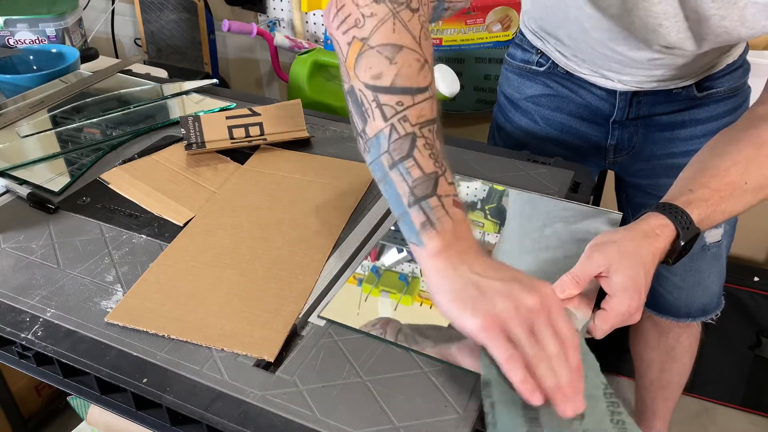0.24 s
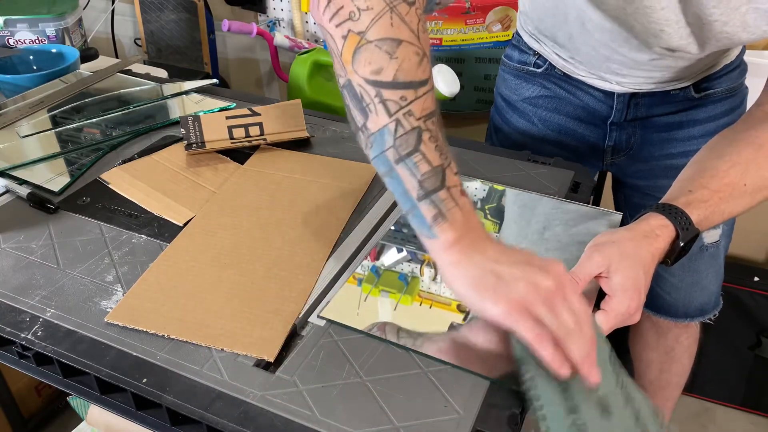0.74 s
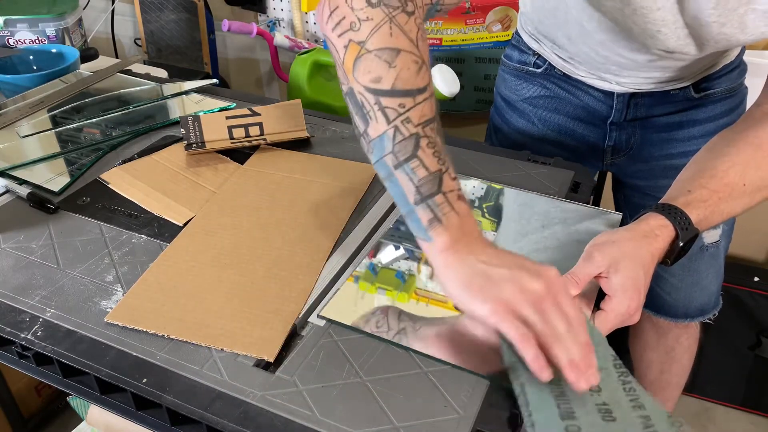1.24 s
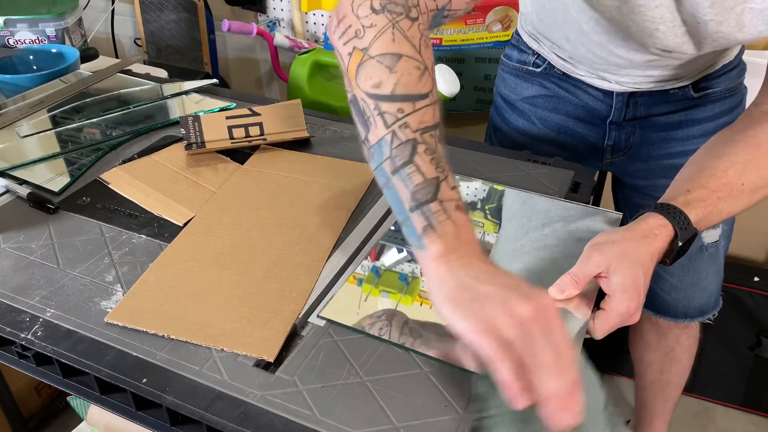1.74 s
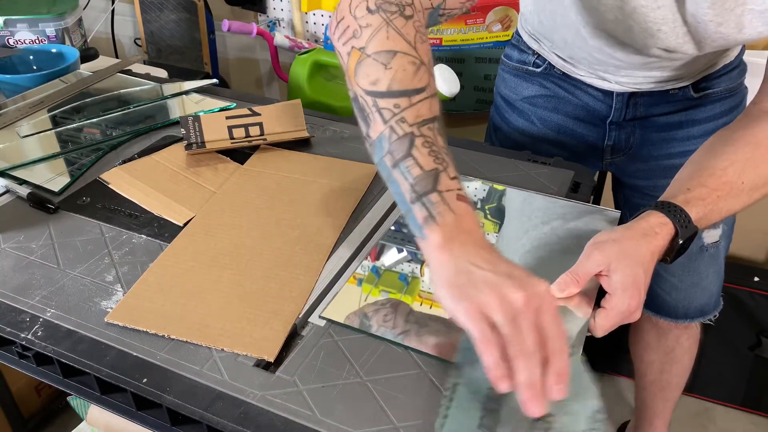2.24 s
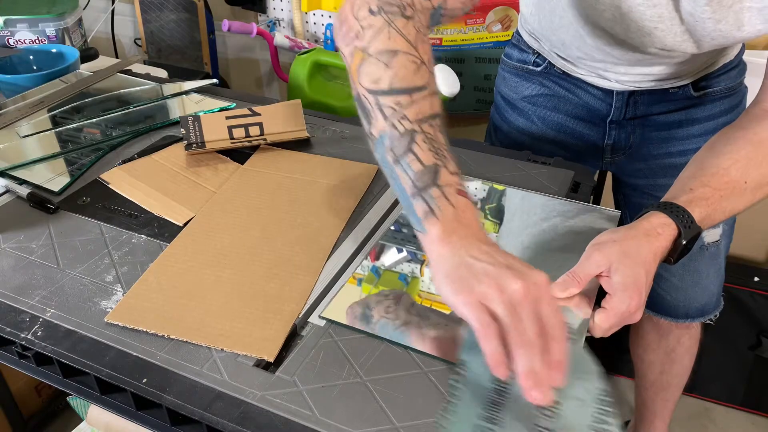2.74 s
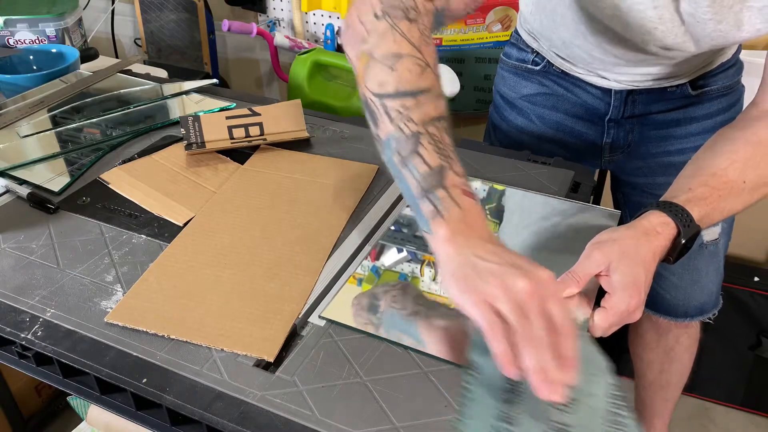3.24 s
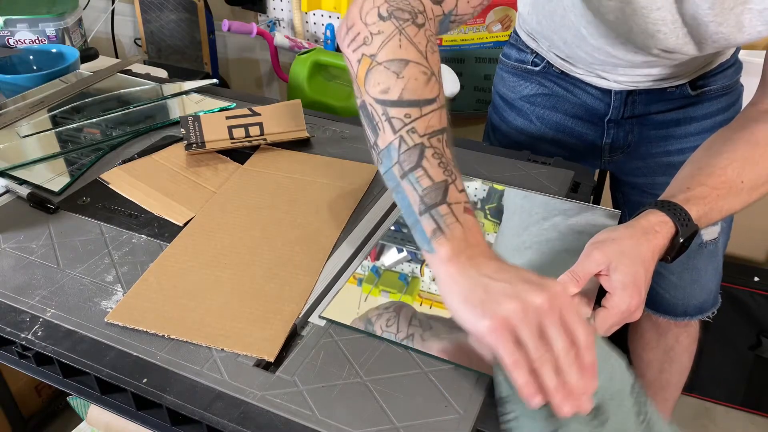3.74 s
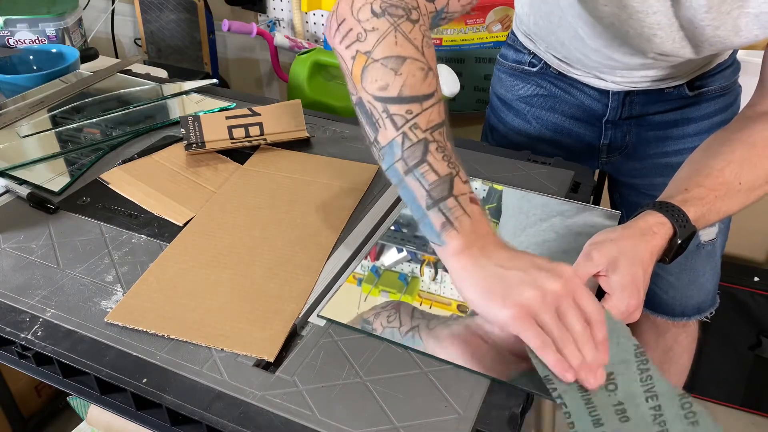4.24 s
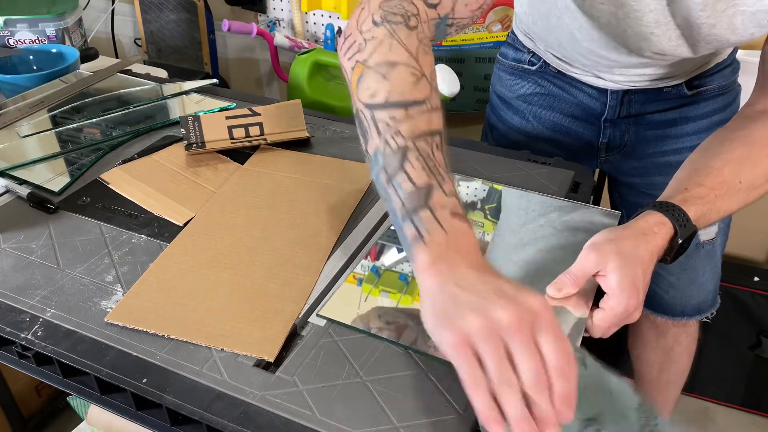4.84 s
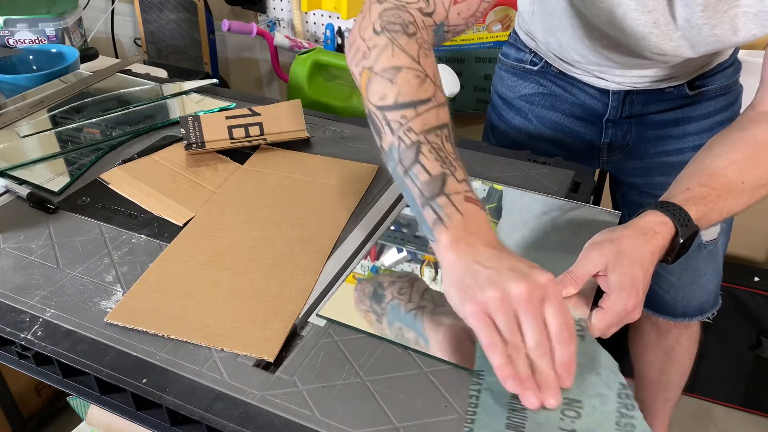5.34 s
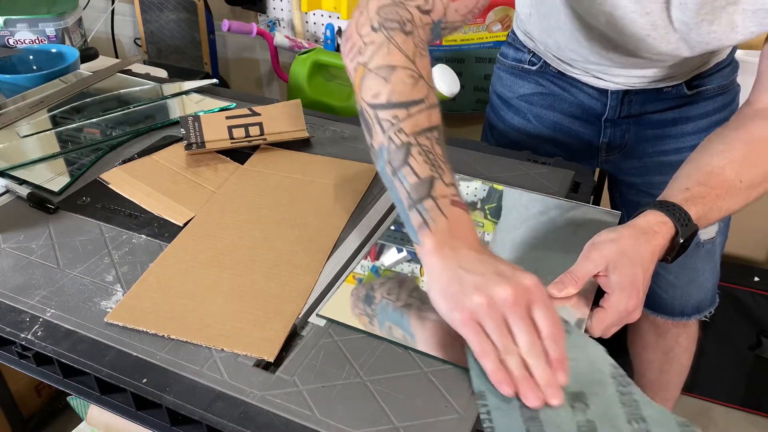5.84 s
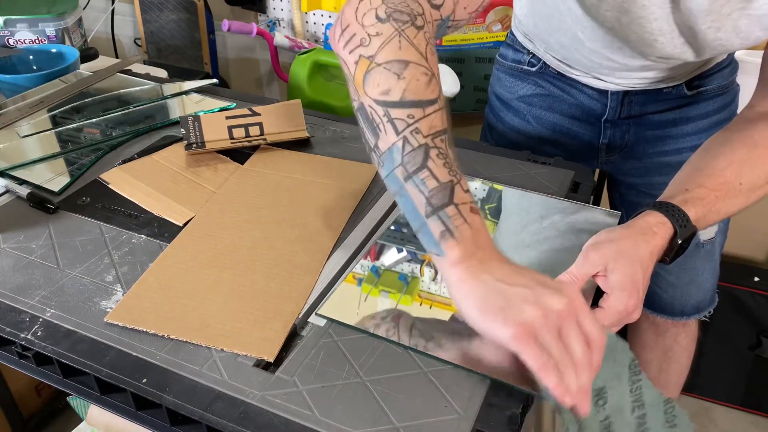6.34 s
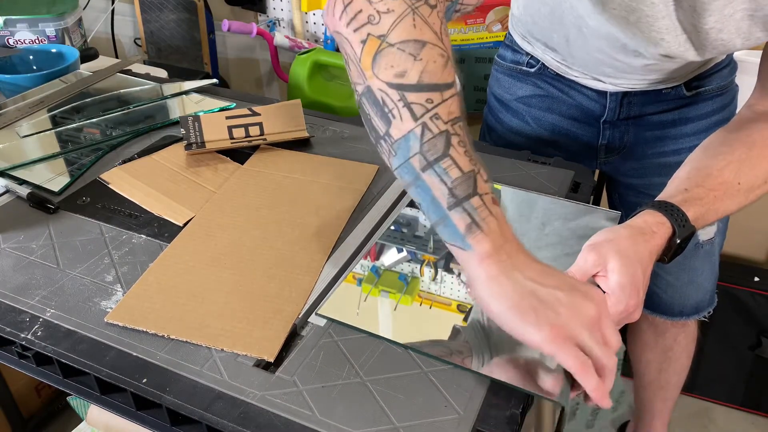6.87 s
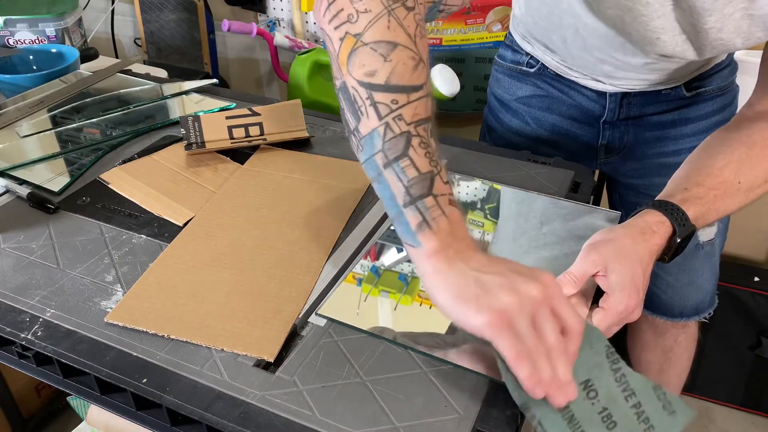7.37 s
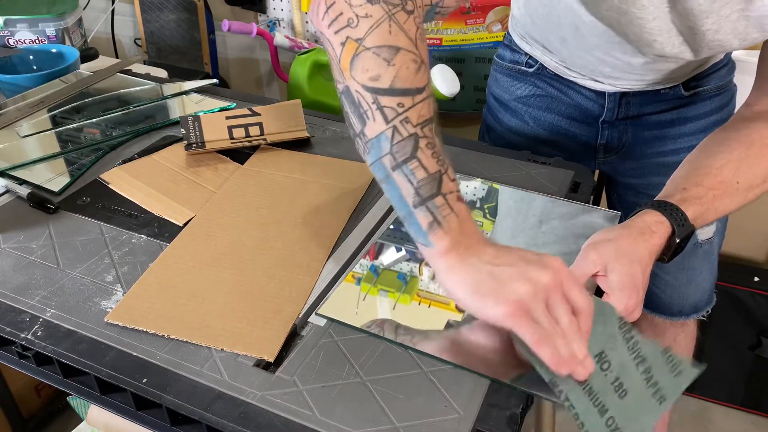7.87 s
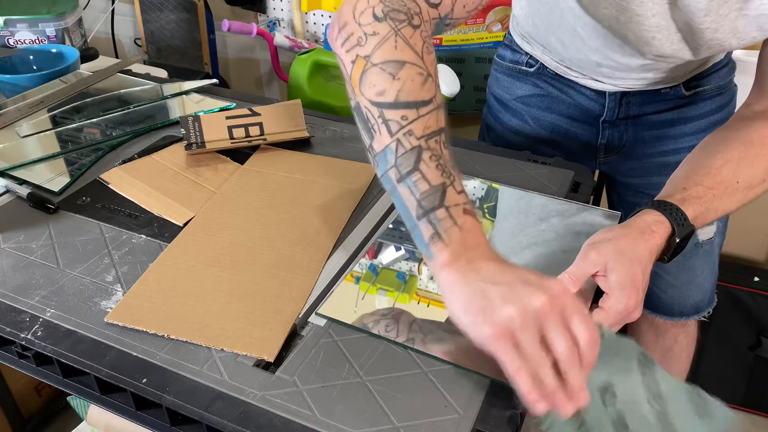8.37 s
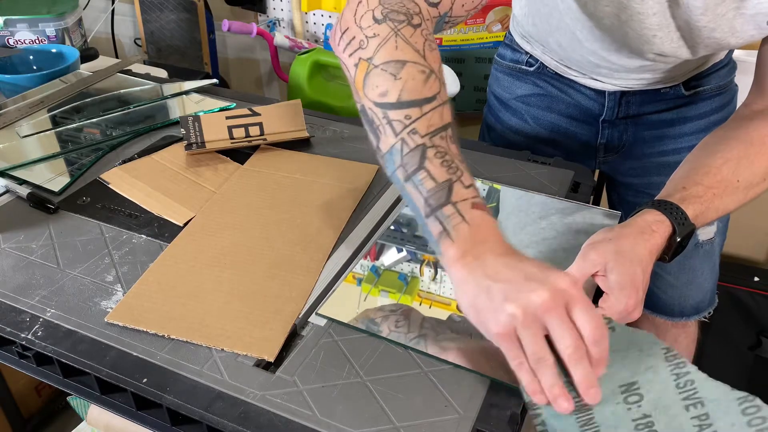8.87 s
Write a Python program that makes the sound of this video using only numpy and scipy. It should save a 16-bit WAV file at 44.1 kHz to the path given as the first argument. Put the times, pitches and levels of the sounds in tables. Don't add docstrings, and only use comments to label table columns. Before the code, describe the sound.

A hand rubs sandpaper along the cut edge of a glass tile on a workbench, heard close in a damped workshop. From 0 to 2 seconds, strong, gritty rasps alternate rapidly, about nine or ten a second, with bright hiss, sharp grit clicks and small bench thuds. Around 2.1 a short squeak marks a sudden drop; until 3.6 the rubs are faint, airy and slower, swelling slightly near 3. From 3.6 to 4.8 choppier, more tonal scrapes catch and snag. Near-silence follows, then taps and paper contact around 5.15 to 5.25, and uneven strokes build until 6.1. After a tiny gap, quick, regular strokes run from 6.25 to the end just after 9, with clicks and brief clear glassy notes. The sound is narrow-band, without extreme highs, over a nearly silent background.

```python
import sys
import numpy as np
from scipy import signal
from scipy.io import wavfile
from scipy.ndimage import uniform_filter1d

SR = 44100
rng = np.random.default_rng(int(sys.argv[2]) if len(sys.argv) > 2 else 0)


def gain_from_decibels(decibels):
    exponent = np.asarray(decibels, float) / 20
    return 10 ** exponent


def int16_out(signal):
    q = np.round(np.clip(np.atleast_2d(signal).T, -1, 1) * 32767)
    wavfile.write(sys.argv[1], SR, q.astype(np.int16))


N = 401751

# time in seconds, slack of the sheet (paper in dB against the scrape),
# freedom of the tile (ring in dB against the paper), weight on the bench (dB against the paper).
GRIP = [(0, -11, -4.5, -12), (1.5, -9.5, -4, -11), (2.03, -8.5, -3, -11), (2.2, -4.5, -6, -6),
        (2.5, -9.5, -8.5, -8.5), (3.0, -14, -9, -6.5), (3.42, -2.5, -5.5, -9.5), (3.699, -10, 0, -10),
        (4.1, -12, -9.5, -9), (4.45, -16.5, -10, -4), (4.75, -16.5, -6, -12), (5.2, -6, -11, -7),
        (5.7, -6.5, -10.5, -14.5), (6.3, -10.5, -7, -8), (6.95, -7.5, 0, -9.5), (7.5, -11, -7, -10.5),
        (8.5, -6.5, -4, -13), (9.05, -7.5, -5, -11)]
# time in seconds, their strength in dB
# against the body, edge pitch in Hz, hiss pitch in Hz.
FOCUS = [(0, 3, 2580, 5000), (.62, -8.5, 3020, 5200), (2, -7.5, 2940, 5070), (2.3, 5.5, 3230, 5340),
         (2.62, 1.5, 3370, 5200), (2.79, 6, 3100, 5130), (2.95, 0, 3580, 5450), (3.12, 0, 3480, 4980),
         (3.62, 2.5, 2920, 5180), (3.9, 6.5, 2920, 5760), (4.25, 5.5, 2840, 5360), (4.6, 7, 2890, 5340),
         (4.8, 0.5, 2800, 5710), (5.3, -6.5, 2920, 5330), (7.8, -7.5, 3000, 5440), (8.1, -4, 3310, 5570),
         (9.1, -4, 2960, 5960)]

# time of top speed in seconds, rise in seconds, fall in seconds,
# edge level in dB, grit hiss in dB against the edge.
FIRM_STROKES = [(0.012, 0.048, 0.057, -28.5, 5.5), (0.122, 0.057, 0.062, -23.5, 4.5),
                (0.216, 0.056, 0.065, -24, 3.5), (0.35, 0.074, 0.043, -20, 1.5),
                (0.419, 0.044, 0.09, -21.5, 4), (0.555, 0.071, 0.044, -20.5, 4),
                (0.635, 0.051, 0.093, -23, 4), (0.776, 0.075, 0.043, -21.5, 4.5),
                (0.848, 0.041, 0.11, -24, 6), (1.025, 0.088, 0.038, -24.5, 3.5),
                (1.114, 0.056, 0.072, -23.5, 2), (1.237, 0.061, 0.047, -21, 1),
                (1.306, 0.031, 0.12, -21.5, 1.5), (1.41, 0.015, 0.11, -20, 4.5),
                (1.539, 0.04, 0.077, -24, 1.5), (1.669, 0.062, 0.055, -23.5, 0.5),
                (1.743, 0.033, 0.093, -22, 1.5), (1.887, 0.086, 0.064, -24, 4.5),
                (1.959, 0.02, 0.045, -23, 2.5), (1.989, 0.01, 0.13, -28.5, 2.5)]
# time in seconds, rise in seconds, fall in seconds, edge level in dB,
# hiss in dB against the edge.
LIGHT_STROKES = [(2.1, 0.0076, 0.063, -27, 9), (2.184, 0.04, 0.057, -42, 7.5),
                 (2.302, 0.054, 0.098, -46, 11), (2.509, 0.12, 0.039, -42.5, 4.5),
                 (2.632, 0.088, 0.087, -39.5, 3.5), (2.792, 0.07, 0.063, -33, 6.5),
                 (2.959, 0.08, 0.074, -30.5, 3), (3.133, 0.096, 0.073, -38.5, 4.5),
                 (3.289, 0.102, 0.021, -48, 3.5), (3.358, 0.074, 0.06, -43.5, 1),
                 (3.437, 0.027, 0.11, -44, 3), (3.548, 0.036, 0.091, -44, 7.5)]
# time in seconds, rise in seconds, fall in seconds,
# edge level in dB, hiss in dB against the edge.
CORNER_STROKES = [(3.616, 0.017, 0.042, -29.5, -9.5), (3.698, 0.039, 0.055, -30, -2.5),
                  (3.817, 0.068, 0.077, -32.5, -3.5), (3.915, 0.045, 0.045, -27, -7),
                  (4.035, 0.065, 0.054, -28.5, -3.5), (4.102, 0.017, 0.08, -24.5, -0.5),
                  (4.266, 0.045, 0.02, -29, 4), (4.333, 0.044, 0.093, -31, 0),
                  (4.475, 0.06, 0.037, -23.5, 3), (4.575, 0.05, 0.042, -25.5, 0),
                  (4.689, 0.076, 0.017, -39.5, 2.5), (4.796, 0.062, 0.043, -24.5, -0.5),
                  (4.891, 0.11, 0.093, -52.5, -1.5)]
# time in seconds, rise in seconds, fall in seconds,
# edge level in dB, hiss in dB against the edge.
RESET_STROKES = [(5.172, 0.006, 0.038, -46, -9), (5.267, 0.017, 0.0063, -27, 7),
                 (5.299, 0.06, 0.083, -37.5, 6), (5.437, 0.177, 0.061, -30, 1.5),
                 (5.583, 0.072, 0.065, -29, 3.0), (5.707, 0.055, 0.091, -23, 3),
                 (5.869, 0.068, 0.064, -28.5, 4), (5.996, 0.057, 0.11, -22.5, -0.5),
                 (6.145, 0.0043, 0.04, -33, 0.5)]
# time in seconds, rise in seconds, fall in seconds,
# edge level in dB, hiss in dB against the edge.
RINGING_STROKES = [(6.278, 0.024, 0.11, -22.5, -1.5), (6.398, 0.042, 0.066, -22.5, 2.5),
                   (6.505, 0.052, 0.053, -20.5, 2.5), (6.61, 0.076, 0.062, -23.5, 1.5),
                   (6.679, 0.022, 0.095, -26, 1.5), (6.782, 0.036, 0.051, -29.5, 3),
                   (6.855, 0.021, 0.087, -28.5, 4.5), (6.965, 0.049, 0.064, -23.5, 4),
                   (7.038, 0.02, 0.081, -28.5, 7.5), (7.163, 0.055, 0.062, -24.5, 3.5),
                   (7.263, 0.054, 0.068, -23.4, -2.8)]
# time in seconds, rise in seconds, fall in seconds, edge level in dB,
# hiss in dB against the edge.
CLOSING_STROKES = [(7.354, 0.033, 0.058, -25.6, -0.4), (7.445, 0.034, 0.088, -22.5, -3),
                   (7.535, 0.032, 0.08, -22, -1.5), (7.653, 0.048, 0.071, -24, 3.5),
                   (7.734, 0.026, 0.08, -26.5, 7.5), (7.866, 0.065, 0.056, -24.5, 1),
                   (7.95, 0.04, 0.066, -25, 3), (8.069, 0.054, 0.044, -22.5, -0.5),
                   (8.147, 0.041, 0.12, -24, 2), (8.306, 0.037, 0.049, -23.6, 2),
                   (8.4, 0.055, 0.085, -22.5, -0.5), (8.498, 0.013, 0.085, -23, -3.5),
                   (8.593, 0.026, 0.045, -26, -1), (8.695, 0.046, 0.063, -24, 4),
                   (8.777, 0.026, 0.075, -24.5, 0), (8.892, 0.037, 0.049, -21.5, 1),
                   (8.979, 0.037, 0.046, -32.5, 2.5), (9.058, 0.054, 0.093, -20.5, -0.3)]
# time in seconds, rise in seconds, fall in seconds,
# edge level in dB, hiss in dB against the edge.
LANDINGS = [
    (5.123, .006, 0.026, -60.5, 4),
    (6.135, 0.0056, .03, -43, -3),
]
# time in seconds, fall in seconds, edge level in dB,
# hiss in dB against the edge.
CATCHES = [(0.292, 0.019, -33, 8.6), (0.617, 0.023, -24, 4), (0.96, 0.035, -22.5, -2),
           (2.009, 0.027, -21.5, -7), (2.306, 0.017, -45.5, 11), (2.489, 0.014, -35, 4),
           (2.619, 0.035, -34, 7), (2.938, 0.02, -35, 15), (3.086, 0.011, -40, 7),
           (3.124, 0.037, -25.5, -3), (3.664, 0.0069, -36, -20.5), (3.828, 0.027, -22, -9.5),
           (4.034, 0.037, -19.5, -0.5), (4.24, 0.021, -27, 3.5), (4.328, 0.04, -22.5, -3),
           (4.673, 0.054, -21.5, -0.5), (4.764, 0.017, -28.5, 12), (4.781, 0.036, -23.5, 5),
           (4.842, 0.019, -35.5, -7), (5.346, 0.022, -29, -2), (5.408, 0.016, -25, 1.5),
           (5.81, 0.042, -30, 6), (5.953, 0.016, -33, -3), (6.051, 0.056, -23.5, -3.5),
           (6.327, 0.021, -31, 8), (6.72, 0.023, -25, -1.5), (8.254, 0.05, -25, -6), (8.969, 0.012, -21, 3)]
BITE = 0.26

# pitch in Hz, width in Hz, level in dB against the band.
EDGE = (2300, 4350), [(2750, 250, -9), (3350, 150, -12), (3800, 150, -14)]
# pitch in Hz, width in Hz, level in dB against the band.
HISS = (4400, 8400), [(4800, 170, -11), (5300, 66, -11.5), (5963, 190, -8), (7320, 200, -26.5)]
# pitch in Hz, width in Hz, level in dB against the band.
PAPER = (880, 1950), [(1040, 120, -10), (1250, 150, -14), (1640, 80, -16)]
# pitch in Hz, width in Hz, level in dB against the band.
TILE = (1930, 2330), [(2138, 55, 1), (2050, 70, -5)]
# pitch in Hz, width in Hz, level in dB against the band.
BENCH = (237, 900), [(245, 45, -9), (342, 40, -2.5), (518, 41, -1.5), (686, 45, 0)]
RUMBLE_DB = -21

# time in seconds, pitch in Hz, width in Hz, peak level in dB.
TAPS = [(.632, 253, 59, -30), (1.35, 236, 60, -31), (1.429, 285, 69, -29), (1.555, 230, 59.6, -35.5),
        (4.929, 4500, 1995, -45.5), (5.128, 604, 200, -29.5), (5.157, 5300, 400, -38),
        (5.157, 7300, 400, -40), (5.161, 700, 250, -35), (5.168, 1265, 200, -24.5), (5.173, 1300, 250, -25),
        (5.167, 3300, 250, -30), (5.167, 5000, 900, -35), (.557, 5500, 700, -5), (.62, 6000, 600, -7),
        (.6245, 5500, 600, -4), (1.415, 4930, 600, -6), (1.42, 5000, 600, -4), (1.428, 3500, 700, -6),
        (6.412, 5000, 700, -8), (5.188, 3300, 300, -33), (5.243, 3300, 200, -34), (5.25, 5700, 600, -24),
        (4.161, 800, 500, -23), (5.169, 2570, 150, -34), (5.243, 4500, 300, -25), (5.251, 1200, 500, -24),
        (5.807, 251, 55, -28), (6.245, 895, 298, -31.5), (8.45, 219, 70, -38), (8.967, 303, 70, -32)]
# time in seconds, peak level in dB, pitch in Hz.
SNAPS = [(0.2783, -12, 5190), (0.2912, -7, 4790), (0.614, -2, 6260), (0.9562, -9, 4960), (1.2915, -4, 5480),
         (1.3992, -7, 5900), (1.4097, 0, 4680), (1.951, -8, 5740), (2.0991, -7.5, 2050),
         (3.0864, -17, 5940), (3.1228, -8, 3240), (3.605, -18, 2860), (3.6641, -15, 2760),
         (3.8272, -10, 2690), (3.8896, -11, 2680), (4.0282, -7, 2790), (4.0951, -12, 5260),
         (4.0971, -8.5, 5650), (4.2348, -10, 5740), (4.3206, -11, 2850), (4.5376, -19, 2940),
         (4.5377, -12.5, 2600), (4.6653, -9, 2820), (4.7636, -4, 5950), (5.1662, -31, 5330),
         (5.1677, -26, 3280), (5.25, -15, 2320), (5.2592, -11, 5940), (5.6665, -11, 5480),
         (5.8037, -16, 7100), (5.952, -10, 3070), (6.141, -21, 3460), (6.255, -19, 2110),
         (6.2617, -10.5, 3770), (6.376, -6.5, 5170), (6.4702, -6, 4760), (6.8426, -11, 2120),
         (6.9371, -9, 5130), (7.3307, -15, 3410), (7.4255, -11, 2860), (8.492, -8.5, 2150),
         (8.6572, -11.5, 2130), (8.768, -13, 5070), (8.771, -9, 6150), (8.8647, -7, 2920),
         (8.9665, -9, 3040)]
SNAP_WIDTH_HZ, SNAP_DB = 450, -5.5

# time in seconds, length in seconds, pitch in Hz, width in Hz, level in dB.
SQUEAKS = [(0.628, .02, 6030, 302, -15), (2.11, 0.023, 3180, 202, -19.5), (2.294, 0.024, 1854, 90, -23),
           (2.475, 0.04, 1290, 160, -36), (2.488, .03, 3900, 200, -32), (2.616, 0.026, 1290, 150, -35),
           (3.088, .012, 5900, 200, -31), (3.124, 0.019, 1000, 600, -28), (3.145, 0.019, 4800, 398, -28),
           (3.46, 0.041, 500, 202, -41), (3.529, 0.036, 434, 164, -37.5), (3.54, 0.048, 7140, 120, -37),
           (4.174, 0.02, 770, 400, -33), (4.44, 0.035, 1190, 400, -35), (4.678, 0.042, 1560, 150.6, -30.5),
           (6.149, 0.019, 3520, 200, -32), (6.15, 0.023, 2010, 200, -43.5), (2.11, 0.036, 2040, 80, -20.5),
           (2.189, 0.018, 1300, 392, -26), (2.79, 0.038, 900, 497, -37.5), (3.351, 0.036, 970, 393, -42),
           (3.539, 0.047, 2030, 78.6, -34.5), (5.138, 0.02, 750, 800, -41), (6.853, 0.035, 2140, 50.6, -29),
           (2.645, .04, 700, 300, -37), (2.3, .03, 5500, 600, -33), (6.06, .04, 3700, 600, -28),
          (2.765, .02, 2900, 200, -37), (2.805, .02, 3100, 200, -36), (2.925, .03, 5700, 600, -27),
          (2.975, .035, 3800, 300, -34), (3.608, .012, 2850, 250, -31), (3.672, .025, 2750, 200, -29.5),
          (3.703, .025, 3200, 350, -25), (6.6, .05, 1040, 180, -29.5), (3.893, .012, 2750, 300, -24),
          (3.7, .04, 1000, 200, -35.5), (3.72, .04, 1950, 200, -35), (4.2, .018, 3100, 250, -31),
          (3.8, .045, 6450, 150, -38), (3.92, 0.037, 3300, 600, -23.5), (3.915, .05, 1900, 200, -33.5),
          (3.91, .05, 950, 150, -37.5), (4.0, .025, 3400, 300, -34), (4.027, .018, 5000, 400, -29.5),
          (4.1, .015, 5500, 600, -26.5), (4.107, .018, 7000, 400, -27), (4.135, .035, 3200, 500, -26.5),
          (4.245, 0.027, 5400, 800, -26), (4.24, .018, 3600, 300, -29), (4.27, 0.023, 2600, 270, -31),
          (4.57, .055, 2800, 350, -25), (4.555, .04, 5400, 700, -27), (4.7, .02, 2160, 200, -31),
          (4.77, .02, 5800, 800, -22), (4.4, .03, 940, 150, -32), (4.775, 0.039, 1750, 150, -31),
          (4.847, 0.013, 480, 120, -40), (4.845, 0.023, 1750, 250, -36.5), (5.18, 0.028, 1200, 400, -38),
          (5.175, .02, 3320, 300, -40), (5.256, .008, 520, 250, -30), (1.415, 0.028, 5000, 700, -19)]
# time in seconds,
# length in seconds, level in dB.
SINGING = [(6.508, .055, -25), (6.574, .025, -26), (6.625, .028, -23), (6.698, .045, -28), (6.79, .03, -33),
           (6.984, 0.038, -25), (7.049, 0.033, -24.5), (7.17, .04, -27), (7.247, .03, -29),
           (8.497, .025, -28), (8.66, .025, -31.5), (9.06, .04, -28), (0.571, .03, -29)]
SING_HZ, SING_WIDTH_HZ = 2140, 60

# pitch in Hz, time to fall by 60 dB in seconds.
ROOM = [(250, .45), (2500, .44), (7000, .3)]
FLOOR_DB = -80
# pitch in Hz, gain in dB.
LINK = [(0, 0), (7300, 0), (7620, -10), (8030, -33.5), (8120, -40.5), (8500, -54), (SR / 2, -90)]


def evened(x):
    return x / np.sqrt(np.mean(x ** 2) + 1e-20)


def unit(x):
    return x / np.linalg.norm(x)


def scattered(drive):
    return drive * rng.choice([-1., 1.], len(drive))


def mode(hz, width, t):
    fade = t * np.exp(-1.5 * np.pi * width * t)
    return unit(fade * np.sin(2 * np.pi * hz * t))


def slips(per_s, spread_db, judder_db):
    size_db = spread_db * np.minimum(rng.exponential(1, N), 4)
    size = gain_from_decibels(size_db) * rng.standard_normal(N)
    judder = evened(uniform_filter1d(uniform_filter1d(rng.standard_normal(N), 180), 120))
    lets_go = rng.random(N) < per_s / SR
    return evened(size * lets_go * gain_from_decibels(judder_db * judder))


def strokes():
    caught = [(s, BITE * fall, fall, db, hiss_db) for s, fall, db, hiss_db in CATCHES]
    return np.vstack([FIRM_STROKES, LIGHT_STROKES, CORNER_STROKES, RESET_STROKES,
                      RINGING_STROKES, CLOSING_STROKES, LANDINGS, caught])


def speed(extra_db, linger):
    t = np.arange(N // 64 + 2) * 64 / SR
    power = np.zeros(len(t))
    for (s, rise, fall, db, *_), extra in zip(strokes(), extra_db):
        rising = t < s
        away = abs(t - s) / np.where(rising, max(rise, .003), linger * max(fall, .003))
        bend = np.where(rising, 3.2, 2.4)
        power += gain_from_decibels(2 * (db + extra - 20 * away ** bend))
    return np.interp(np.arange(N) / SR, t, np.sqrt(power))


def ring(drive, body):
    (low_hz, high_hz), modes = body
    t = np.arange(4096) / SR
    band_filter = signal.butter(3, [low_hz, high_hz], "band", fs=SR, output="sos")
    band = unit(signal.sosfilt(band_filter, t == 0))
    rings = sum(gain_from_decibels(db) * mode(hz, width, t) for hz, width, db in modes)
    both = signal.oaconvolve(drive, band) + signal.oaconvolve(scattered(drive), rings)
    return both[:N] / np.sqrt(1 + rings @ rings)


def gather(drive, body, strength, hz, width):
    turn = np.exp(2j * np.pi * np.cumsum(hz) / SR)
    r = np.exp(-np.pi * width / SR)
    peak = (turn * signal.lfilter([1], [1, -2 * r, r * r], scattered(drive) / turn)).real
    peak *= np.sqrt(2 * (1 - r * r) ** 3 / (1 + r * r))
    no_bass = signal.butter(2, body[0][0] / 2, "high", fs=SR, output="sos")
    peak = signal.sosfilt(no_bass, peak)
    return (ring(drive, body) + strength * peak) / np.sqrt(1 + strength ** 2)


def sanding():
    t = np.arange(N) / SR
    hiss_db = strokes()[:, 4]
    s, slack_db, tile_db, bench_db = np.transpose(GRIP)
    at, focus_db, edge_hz, hiss_hz = np.transpose(FOCUS)
    focus = gain_from_decibels(np.interp(t, at, focus_db))
    shared = slips(20000, 1.8, 0.99)

    edge = speed(0 * hiss_db, 0.85)
    hiss = speed(hiss_db, 0.8)
    paper = np.hypot(edge, hiss) * gain_from_decibels(np.interp(t, s, slack_db))
    tile = paper * gain_from_decibels(np.interp(t, s, tile_db))
    bench = uniform_filter1d(paper, 1500) * gain_from_decibels(np.interp(t, s, bench_db))

    hiss_slips = evened(shared + slips(15000, 3.5, 2.0))
    out = gather(edge * shared, EDGE, focus, np.interp(t, at, edge_hz), 870)
    out -= gather(hiss * hiss_slips, HISS, focus, np.interp(t, at, hiss_hz), 1100)
    out += ring(paper * scattered(shared), PAPER)
    out += ring(tile * slips(6000, 2.2, 2.0), TILE)
    out += ring(bench * slips(4000, 2.6, 2.1), BENCH)

    low_pass = signal.butter(1, 200, fs=SR, output="sos")
    rumble = evened(signal.sosfilt(low_pass, rng.standard_normal(N)))
    return out + gain_from_decibels(RUMBLE_DB) * uniform_filter1d(bench, 2500) * rumble


def shifting_contact(x, patchy_db):
    hz, t, z = signal.stft(x, SR, nperseg=512, noverlap=384)
    patches = rng.standard_normal(z.T.shape)
    patches = uniform_filter1d(uniform_filter1d(patches, size=12, axis=0), size=8, axis=0)
    broad = uniform_filter1d(patches, size=7, axis=1)
    patches = evened(evened(patches) + evened(broad))
    gain = evened(gain_from_decibels(patchy_db * patches.T))
    return signal.istft(z * gain, SR, nperseg=512, noverlap=384)[1][:N]


def taps():
    out, t = np.zeros(N), np.arange(2000) / SR
    snaps = [(s, hz, SNAP_WIDTH_HZ, db + SNAP_DB) for s, db, hz in SNAPS]
    for s, hz, width, db in TAPS + snaps:
        tap = mode(hz, max(width, 20), t)
        out[round(s * SR):][:len(t)] += gain_from_decibels(db) * tap / abs(tap).max()
    return signal.sosfilt(signal.butter(2, 140, "high", fs=SR, output="sos"), out)


def squeaks():
    out, t = np.zeros(N), np.arange(N) / SR
    drive = slips(9000, 2.0, 1.6)
    sung_tile = [(s, length, SING_HZ, SING_WIDTH_HZ, db) for s, length, db in SINGING]
    for s, length, hz, width, db in SQUEAKS + sung_tile:
        at = slice(round((s - length) * SR), round((s + length) * SR))
        burst = drive[at] * np.exp(-(2 * (t[at] - s) / length) ** 2)
        sung = signal.fftconvolve(burst, mode(hz, max(width, 20), t[:1500]))
        out[at.start:at.start + len(sung)] += gain_from_decibels(db) * sung[:N - at.start]
    return signal.sosfilt(signal.butter(3, 300, "high", fs=SR, output="sos"), out)


def workshop(x):
    echoes = np.zeros(SR // 2)
    at = np.arange(300, SR // 2 - 20, 20)
    echoes[at + rng.integers(0, 20, len(at))] = rng.choice([-1., 1.], len(at))
    hz, t, z = signal.stft(echoes, SR, nperseg=256)
    f, t60 = np.transpose(ROOM)
    fade_db = -60 * t / np.interp(hz, f, t60)[:, None]
    tail = signal.istft(z * gain_from_decibels(fade_db), SR, nperseg=256)[1]
    return signal.oaconvolve(x, unit(tail))[:N]


def scene():
    near = shifting_contact(sanding(), patchy_db=2.5)
    near = near + taps() + squeaks()
    room = gain_from_decibels(-25) * workshop(near)
    thin_hiss = gain_from_decibels(FLOOR_DB) * np.diff(rng.standard_normal(N + 1))
    return (near + room + thin_hiss)[None]


def top_cut(x):
    return signal.sosfilt(signal.butter(12, 8580, fs=SR, output="sos"), x)


def record(dry):
    hz, db = np.transpose(LINK)
    fine = np.linspace(0, SR / 2, 1025)
    gain = gain_from_decibels(np.interp(fine, hz, db))
    link = signal.firwin2(1023, fine, gain, window=("kaiser", 9), fs=SR)
    narrow = signal.oaconvolve(dry, link[None], "same")
    mix = narrow - .012 * narrow ** 5
    return top_cut(mix)


dry = scene()
out = record(dry)
int16_out(out)
```